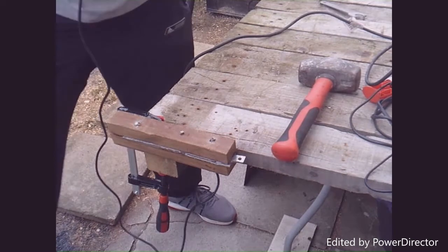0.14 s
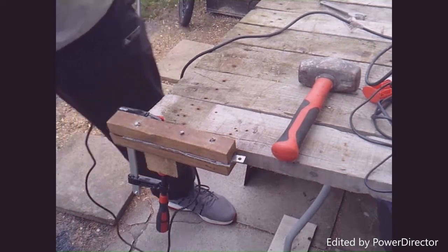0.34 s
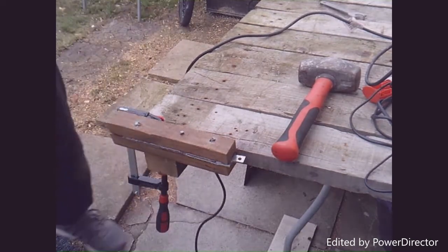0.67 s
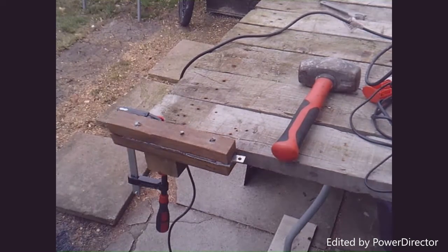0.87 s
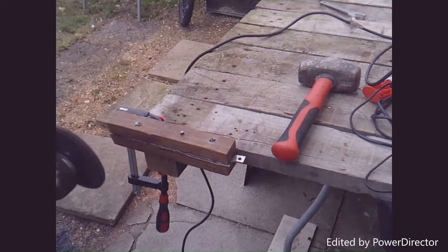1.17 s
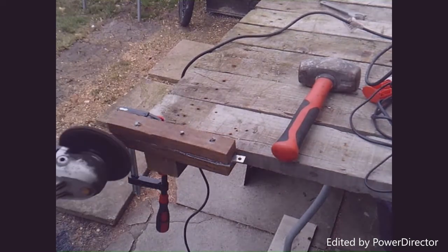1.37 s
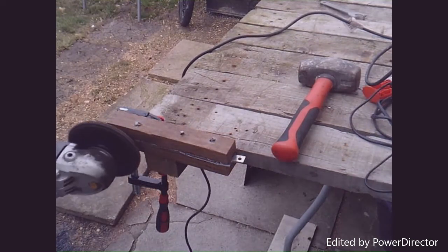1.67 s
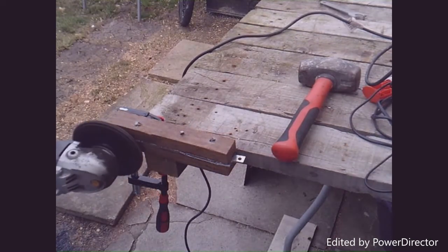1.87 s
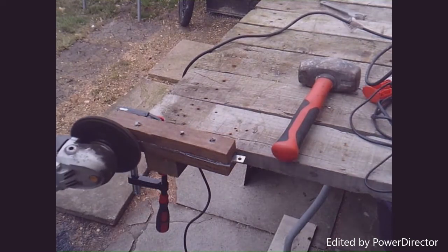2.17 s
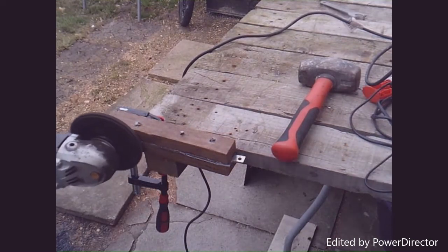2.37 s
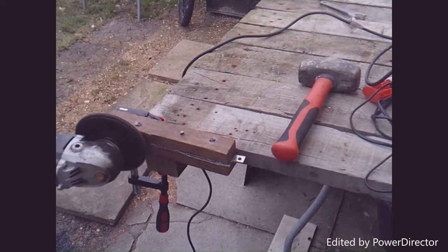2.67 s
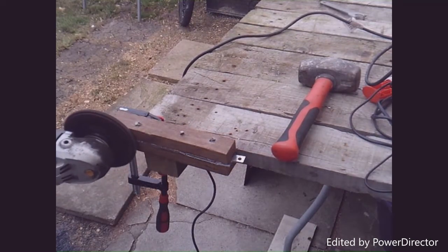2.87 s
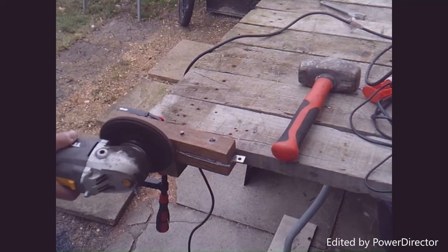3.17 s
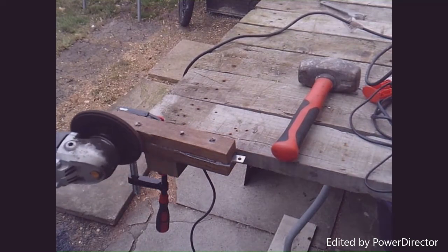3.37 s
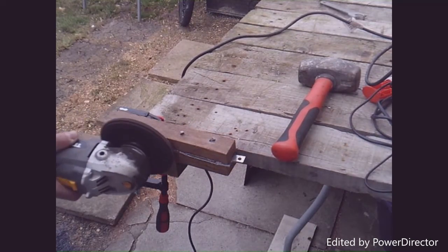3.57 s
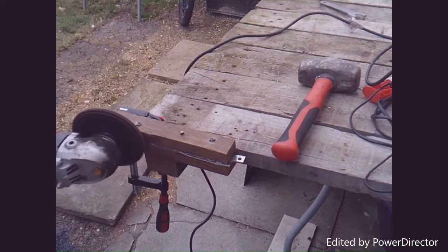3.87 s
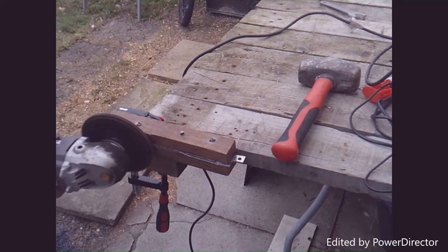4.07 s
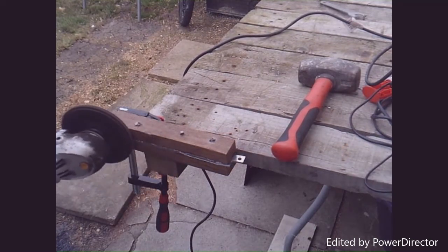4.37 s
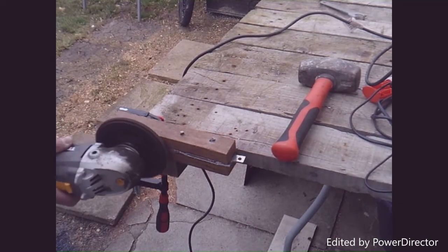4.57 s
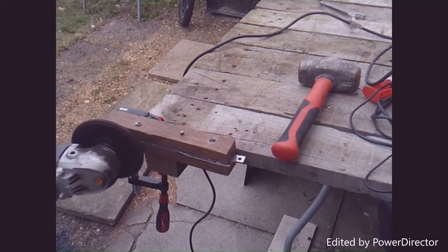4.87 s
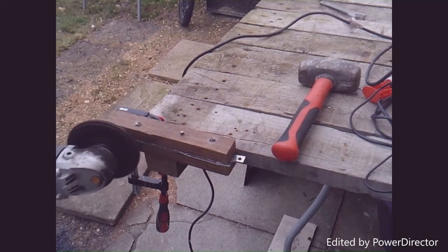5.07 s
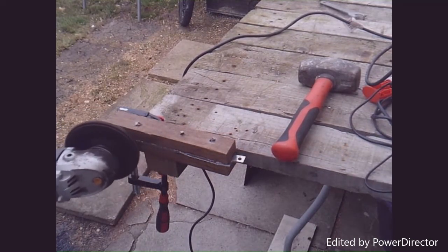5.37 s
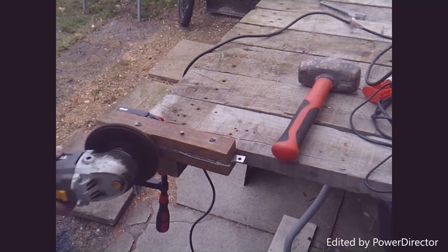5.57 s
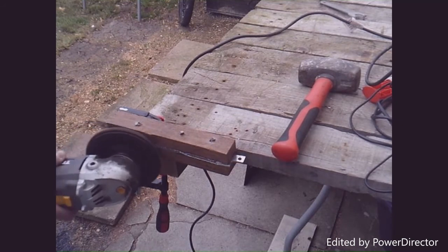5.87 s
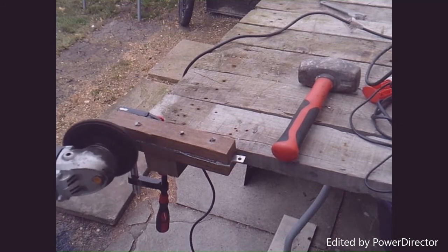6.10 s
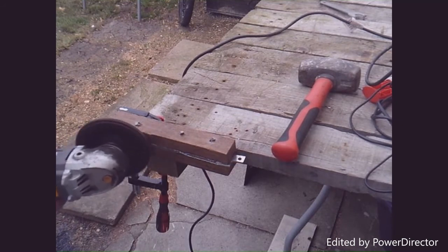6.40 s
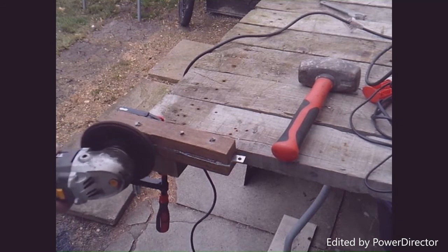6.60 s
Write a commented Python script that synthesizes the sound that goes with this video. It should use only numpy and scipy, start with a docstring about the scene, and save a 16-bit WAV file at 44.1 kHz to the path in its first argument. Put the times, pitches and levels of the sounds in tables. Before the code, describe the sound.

In an open yard, two tiny switch ticks break near-silence, then an angle grinder bursts on, its whine climbing fast to full speed. The disc meets a clamped steel strip: dense gritty hiss, buzzing rasp and brief squeals while the motor slows and wavers. A close, dull microphone distorts the roar, and the level falls suddenly in three steps.

```python
"""An angle grinder is switched on in a yard, runs up, and is leaned on a clamped steel strip, which slows it.
Its motor gives a broad roar with shaft tones, and the bevel gears whine at the tooth-meeting rate.
The disc rubs the strip: loose grit hisses and snags, and the uneven face rasps the same track every turn.
Under it lie a faint yard murk and two switch ticks. A dull microphone clips the loud peaks;
its volume drops in three steps, and the sound below the treble flickers and dips."""
import sys
import numpy as np
from scipy import signal
from scipy.fft import rfft, irfft
from scipy.io import wavfile
from scipy.ndimage import uniform_filter1d

SR = 44100
rng = np.random.default_rng(int(sys.argv[2]) if len(sys.argv) > 2 else 0)


def store_pcm(level_fs):
    """Save levels as 16-bit WAV."""
    pcm = np.round(np.clip(level_fs, -1, 1) * 32767).astype(np.int16)
    wavfile.write(sys.argv[1], SR, np.atleast_2d(pcm).T)


def gain_from_db(level_db):
    """Turn a decibel level (scalar or array-like) into a linear amplitude factor."""
    decades = np.asarray(level_db, float) / 20
    return 10 ** decades


N = 297234  # samples
WHEEL_TEETH, PINION_TEETH = 37, 12


def level(x, db):
    """RMS normalisation: scale to an rms level, or follow a level curve, in dB."""
    return x * gain_from_db(db) / np.sqrt(np.mean(x ** 2))


def shape(x, points):
    """Linear filtering: multiply the spectrum by a response of (Hz, dB) points."""
    hz, db = np.transpose(points)
    bins = np.fft.rfftfreq(N, 1 / SR) + 1
    gain = gain_from_db(np.interp(np.log(bins), np.log(hz), db))
    return irfft(rfft(x) * gain, N)


def coloured(points):
    """Coloured noise: white noise filtered to a spectrum of (Hz, dB) points."""
    return shape(rng.standard_normal(N), points)


def ring(x, hz, width_hz):
    """Resonance: one damped mode with gain 1 at its centre."""
    return signal.lfilter(*signal.iirpeak(hz, hz / width_hz, fs=SR), x)


def walk(rate):
    """Slow random modulation: values held for 1 / rate seconds and slewed twice; spread near 1."""
    hold = int(SR / rate)
    steps = np.repeat(rng.standard_normal(N // hold + 1), hold)
    return 1.3 * uniform_filter1d(uniform_filter1d(steps, hold), hold)[:N]


def tones(phase, table):
    """Order-locked tones: sines at multiples of a shaft angle, wavering in phase and level."""
    return sum(level(np.sin(k * phase + 0.9 * walk(28)), db + 3.3 * walk(26)) for k, db in table)


# Colour of the quiet yard. Each row: frequency in Hz, relative level in dB per Hz.
YARD_COLOUR = [(12, -35.5), (20, -8), (80, -21), (257, -44), (348, -32), (1930, -41.5), (2270, -40),
               (5400, -46.5), (7020, -76.5), (11900, -120)]
# Small ticks as the switch is thumbed. Each row: time in seconds, ring amplitude in dB before the
# yard's fade, ring frequency in Hz.
SWITCH_TICKS = [(0.115, -57, 2290), (0.131, -48.5, 2360)]


def yard():
    """Ambient noise and impulse response: wavering murk that dies away, with decaying switch ticks."""
    out = level(coloured(YARD_COLOUR) * gain_from_db(0.69 * walk(60)), -62)
    t = np.arange(int(0.03 * SR)) / SR
    decay = np.exp(-t / 0.0019)
    for s, db, hz in SWITCH_TICKS:
        i = int(s * SR)
        tick = np.sin(2 * np.pi * hz * t) + 0.5 * rng.standard_normal(len(t))
        out[i:i + len(t)] += gain_from_db(db) * decay * tick
    return out * gain_from_db(-2.5 * np.arange(N) / SR)  # fades by 2.5 dB a second


# How strip, guard and disc ring when rubbed. Each row: frequency in Hz, width of the first of two
# resonances in Hz, relative level in dB.
STRIP_MODES = [(500, 620, -12.5), (1172, 210, -7), (1825, 590, -6.5), (2827, 500, 0), (3640, 330, 0.5),
               (4727, 830, 6), (5338, 540, 7.5)]


def strip(force):
    """Modal response: the steel answers any rubbing force with the same modes."""
    out = 0
    for hz, width_hz, db in STRIP_MODES:
        narrow = ring(force, hz, width_hz)
        # a second, wider resonance steepens the skirts
        out = out + gain_from_db(db) * ring(narrow, hz, 2.44 * width_hz)
    return out


# One bump of the disc face bites and squeals for a moment. Each row: middle in seconds, length in seconds,
# multiple of spindle turns, extra level in dB.
BUMP_SQUEALS = [(1.9, .2, 28, 11), (2.04, .16, 30, 9), (2.12, .07, 28, 12), (2.26, .2, 27, 7),
                (2.42, .25, 33, 5), (2.75, .3, 30, 6), (2.75, .2, 22, 10), (2.9, .6, 35, 5),
                (3.03, .3, 32, 6), (3.02, .2, 31, 6), (3.22, .16, 34, 9), (3.32, .22, 35, 8),
                (3.3, .16, 31, 7), (3.53, .2, 30, 6), (3.62, .16, 34, 7), (3.62, .14, 32, 6),
                (4.24, .07, 35, 10), (4.51, .14, 29, 7), (4.63, .1, 35, 13), (4.72, .16, 32, 8),
                (4.74, .16, 36, 7), (4.72, .16, 33, 6), (5.1, .1, 35, 6), (4.72, .35, 16, 10),
                (5.45, .25, 16, 11), (5.62, .2, 33, 7), (6.02, .22, 33, 8), (6.15, .45, 29, 9),
                (4.05, .3, 25, 11), (3.52, .3, 25, 9)]


def bite_db(k):
    """Transient excitation: extra level of one spindle multiple while it squeals."""
    t = np.arange(N) / SR
    return sum(db * np.exp(-((t - s) / length * 2) ** 4) for s, length, at, db in BUMP_SQUEALS if at == k)


def grit(turn, rasp_db):
    """Random abrasion: hiss with sparse strong impulses where coarse grains catch the steel."""
    snags_per_s = 51
    luck = rng.random(N) * SR / snags_per_s
    snags = np.where(luck < 1, -np.log(luck + 1e-3), 0)
    snags = snags * 9.2 * gain_from_db(rasp_db + 34.5)  # a harder rasp means harder snags
    once_a_turn = 1 + 0.085 * np.cos(turn)
    return (rng.standard_normal(N) + snags) * once_a_turn * gain_from_db(0.43 * walk(40))


def face(turn):
    """Periodic forcing: the uneven face repeats every turn while its bumps wear and shift."""
    tilt_db_per_octave, wear_db = -3.5, 2.2
    # the spindle hunts a little, which blurs the higher multiples most
    shaken = turn + 0.03 * walk(40)
    out = 0
    for k in range(5, WHEEL_TEETH + 2):
        if k == WHEEL_TEETH:  # left to the gear whine
            continue
        bump_db = tilt_db_per_octave * np.log2(k / 30) + wear_db * walk(22) + bite_db(k)
        out = out + gain_from_db(bump_db) * np.sin(k * shaken + walk(20) + rng.uniform(0, 2 * np.pi))
    return out


def disc(turn, grit_db, rasp_db):
    """Source and resonator: random grit and the repeating face both drive the modes of the strip."""
    hiss, rasp = grit(turn, rasp_db), face(turn)
    return level(strip(hiss), grit_db) + level(strip(rasp), rasp_db + 1.5)


# Colour of the motor roar. Each row: frequency in Hz, relative level in dB per Hz.
ROAR_COLOUR = [(30, -18), (120, -19.5), (400, -17), (800, -7.5), (1200, -0.5), (1600, -1), (2000, 0.5),
               (2320, -2.5), (2600, 2.5), (3000, 2.5), (3600, 2.5), (3950, -2), (5000, -12.5), (5600, -7.5)]


def roar(turn, armature, roar_db):
    """Amplitude-modulated broadband noise: fan and brushes throb with spindle and armature."""
    throb = 1 + 0.039 * np.cos(turn) + 0.18 * np.cos(armature)
    return level(coloured(ROAR_COLOUR) * throb * gain_from_db(0.9 * walk(9.8)), roar_db)


def gear_mesh(turn, speed_up, mesh_db):
    """Gear meshing: a whine at the tooth rate, roughened by unequal teeth and backlash."""
    # the rough skirt around the whine is widest while it spins up
    rattle = 1 + 0.3 * np.cos(turn) + (0.15 + 1.6 * speed_up ** 8) * walk(450)
    strength = gain_from_db(mesh_db + 1.5 * walk(25))
    jitter = (0.3 + 2.2 * speed_up ** 8) * walk(200)  # radians
    return strength * rattle * np.sqrt(2) * np.sin(WHEEL_TEETH * turn + jitter)


# Armature imbalance and fan tones, heard under load. Each row: multiple of armature turns, level in dB
# before the load and hum factors.
ARMATURE_TONES = [(1, -59.5), (2, -56.5), (3, -55)]
# Disc imbalance and the strongest bumps of its face. Each row: multiple of spindle turns, level in dB
# before the load and hum factors.
SPINDLE_TONES = [(0.993, -62), (2, -59), (2.997, -61), (4.02, -59.5), (7.92, -52.5), (24.84, -50.5),
                 (15.85, -51.5)]
# Change of the shaft hum. Each row: time in seconds, gain in dB.
HUM_GAIN = [(2.2, 1), (3.0, -2), (4.299, -1), (4.7, 1.5), (6.74, 1.5)]


def shaft_hum(turn, armature, rasp_db):
    """Rotating imbalance: tones locked to each shaft grow with the load."""
    load = gain_from_db(rasp_db + 36)
    hum = load ** 0.91 * tones(armature, ARMATURE_TONES) + load ** 0.21 * tones(turn, SPINDLE_TONES)
    return hum * gain_from_db(np.interp(np.arange(N) / SR, *np.transpose(HUM_GAIN)))


def motor(turn, roar_db, mesh_db, rasp_db):
    """Superposition: roar, gear mesh, shaft tones and run-up strain all follow one shaft angle."""
    armature = turn * WHEEL_TEETH / PINION_TEETH
    # spindle acceleration as a share of 220 turns per second squared
    acceleration = uniform_filter1d(np.gradient(np.gradient(turn)), 2000) * SR ** 2 / (2 * np.pi)
    speed_up = np.clip(acceleration / 220, 0, 1)
    out = roar(turn, armature, roar_db)
    out = out + gear_mesh(turn, speed_up, mesh_db)
    out = out + shaft_hum(turn, armature, rasp_db)
    # pulling up to speed, the armature sings its third multiple through a housing resonance
    return out + ring(speed_up * walk(60) * tones(armature, [(3, -31.5)]), 1270, 80)


# Run-up from the switch to free speed. Each row: time in seconds, spindle turns in Hz, gear mesh whine in dB.
RUN_UP_CURVE = [(0.231, 40.38, -63), (0.27, 58.97, -43), (0.3, 66, -36), (0.33, 81, -43),
                (0.36, 94.5, -36.5), (0.4, 104, -37), (0.44, 112, -42), (0.51, 126.5, -44),
                (0.55, 133, -37), (0.62, 141.2, -34), (0.72, 147.5, -32), (0.9, 161.6, -40),
                (1.2, 171.4, -35.5)]
# Strokes along the strip. Each row: time in seconds, spindle turns in Hz, once-a-turn rasp in dB before
# the disc's 1.5 dB lift.
STRIP_STROKES = [(1.54, 170.4, -43.5), (1.76, 169.3, -44), (1.9, 168.8, -35), (2.09, 166.2, -36),
                 (2.42, 156.2, -32), (2.7, 149.8, -33), (2.83, 148, -30), (2.951, 146.6, -29.5),
                 (3.07, 147.6, -29.5), (3.25, 143.8, -29.5), (3.42, 143.7, -32), (3.6, 145.1, -29.5),
                 (3.78, 141.9, -32), (4.05, 144.4, -33), (4.17, 145.6, -32.5), (4.289, 140.4, -31.5),
                 (4.541, 144.7, -29.5), (4.64, 138.3, -30), (4.75, 136.5, -32), (4.929, 140.7, -33),
                 (5.07, 136.8, -31.5), (5.24, 142.5, -32.5), (5.571, 142.7, -33), (5.679, 139.5, -33),
                 (5.88, 140.1, -33), (6.03, 136.2, -32.5), (6.249, 136.2, -33), (6.381, 132.9, -32),
                 (6.598, 139.1, -32), (6.74, 141.8, -27)]
# Gain of roar and grit as the tool is swung past the microphone and set to the work. Each row: time in
# seconds, gain in dB.
NEARNESS_GAIN = [(0.25, -1), (0.6, -0.5), (0.75, 0.5), (1.05, 3.5), (1.22, 1), (2.1, 0.5), (2.2, -1.5),
                 (3.3, -4), (3.8, -2.5), (4.8, -2.5), (5.3, -2), (6.74, -3.5)]
# Under load the whine is loudest where it meets a ring of the gear housing. Each row: spindle turns in Hz,
# whine in dB before its waver.
LOADED_WHINE = [(134, -37), (138, -38), (140.5, -33.5), (142.5, -31), (145, -31), (148, -34), (165, -45),
                (171.1, -43.5)]


def scene():
    """Common drive: one spindle speed steers every tool sound, which is silent until the switch closes."""
    t = np.arange(N) / SR
    up_s, up_hz, up_db = np.transpose(RUN_UP_CURVE)
    work_s, work_hz, work_db = np.transpose(STRIP_STROKES)
    switch_s, free_s = up_s[0], up_s[-1]
    hz = np.interp(t, np.r_[up_s, work_s], np.r_[up_hz, work_hz])
    turn = 2 * np.pi * np.cumsum(uniform_filter1d(hz, int(0.04 * SR))) / SR  # spindle angle, radians
    # roar and grit rise 18 dB in the first 18 ms
    near_db = np.interp(t, *np.transpose(NEARNESS_GAIN)) + np.interp(t - switch_s, [0, 0.018], [-18, 0])
    # grit grows 6.5 dB as the disc reaches speed
    grit_db = -34.5 + np.interp(t, [switch_s, free_s], [0, 6.5]) + near_db
    rasp_db = np.interp(t, np.r_[free_s, work_s], np.r_[-63, work_db])
    loaded_db = np.interp(hz, *np.transpose(LOADED_WHINE)) + 3 * walk(6)
    mesh_db = np.where(t < free_s, np.interp(t, up_s, up_db), loaded_db)
    tool = motor(turn, -25.5 + near_db, mesh_db, rasp_db) + disc(turn, grit_db, rasp_db)
    return (tool * (t > switch_s) + yard())[None]


def lows(x, top_hz):
    """Low-pass filtering: the part of a sound below top_hz."""
    return shape(x, [(top_hz, 0), (1.15 * top_hz, -40), (SR, -60)])


# The lower bands flicker on their own. Each row: top of the band in Hz, level change in dB before a random
# factor of 0 to 1.7.
BAND_FLICKER = [(200, -5), (450, -5), (900, -3), (2500, -1.2), (4300, -1.5)]
# The body of the sound under the whine dips briefly. Each row: middle in seconds, length in seconds,
# reach in Hz, depth in dB before it eases with the band's height.
BODY_DIPS = [(0.26, 0.051, 500, 14), (1.432, 0.024, 600, 13.5), (1.464, 0.028, 800, 10),
             (1.788, 0.025, 500, 9), (1.868, .02, 700, 5), (1.938, 0.023, 900, 15.5),
             (2.443, 0.047, 599.4, 13), (2.485, 0.041, 795, 4), (2.918, 0.021, 1090, 9),
             (3.051, 0.023, 1000, 8), (3.836, 0.026, 900, 15), (4.296, 0.025, 800, 8),
             (4.368, 0.033, 700, 10), (4.816, 0.037, 500, 9), (5.09, .025, 600, 9), (5.223, 0.024, 880, 0),
             (5.274, 0.02, 901, 5)]


def flicker(x, t):
    """Band-wise gain modulation: each low band fades now and then, and all dip together at listed times."""
    out, below = x, 0
    for top_hz, own_db in BAND_FLICKER:
        band_db = own_db * np.clip(walk(36) - 0.4, 0, 1.3) ** 2
        for at, length, reach_hz, db in BODY_DIPS:
            i = slice(int((at - 2 * length) * SR), int((at + 2 * length) * SR))
            depth_db = db / (1 + (0.7 * top_hz / reach_hz) ** 4)
            band_db[i] -= depth_db * np.exp(-((t[i] - at) / length * 2) ** 4)
        low = lows(x, top_hz)
        out = out + (low - below) * (gain_from_db(band_db) - 1)
        below = low
    return out


# Treble cut of the microphone. Each row: frequency in Hz, gain in dB.
MIC_RESPONSE = [(5100, 0.5), (5280, -10.5), (5420, -20), (5580, -27), (5700, -46.5), (5790, -71)]


def microphone(x):
    """Asymmetric saturation: a lopsided preamp rounds loud swings ahead of a steep treble cut."""
    # uneven response to push and pull turns the hiss envelope into rumble, more when loud
    square = x ** 2 - uniform_filter1d(x ** 2, int(0.06 * SR))
    lopsided = x + 0.45 * gain_from_db(4.6 * walk(7)) * square
    ceiling = gain_from_db(-17.5)
    return shape(ceiling * np.tanh(lopsided / ceiling), MIC_RESPONSE)


def band_limit(x):
    """A steep low-pass at the top of the band."""
    return signal.sosfilt(signal.butter(12, 15740, fs=SR, output="sos"), x)


# Microphone volume. Each row: start in seconds, gain in dB from then on.
VOLUME_STEPS = [(0, 1.5), (1.21, -1.5), (2.135, -5), (4.36, -10.5)]


def record(dry):
    """Gain and hard limiting: stepped volume feeds the microphone; clipping sprays clicks above its cut."""
    t = np.arange(N) / SR
    s, db = np.transpose(VOLUME_STEPS)
    stepped_db = db[np.searchsorted(s, t, "right") - 1]
    volume_db = uniform_filter1d(stepped_db, int(0.0066 * SR))
    x = flicker(microphone(dry[0] * gain_from_db(volume_db)), t)
    top = gain_from_db(-20.1)
    clipped = np.clip(x + 0.0012, -top, top)  # a small constant offset makes the clipping uneven
    return band_limit(clipped[None])


dry = scene()
out = record(dry)
store_pcm(out)
```